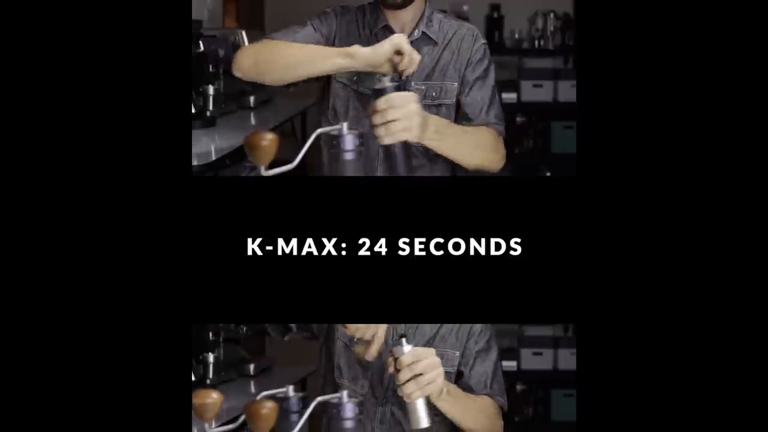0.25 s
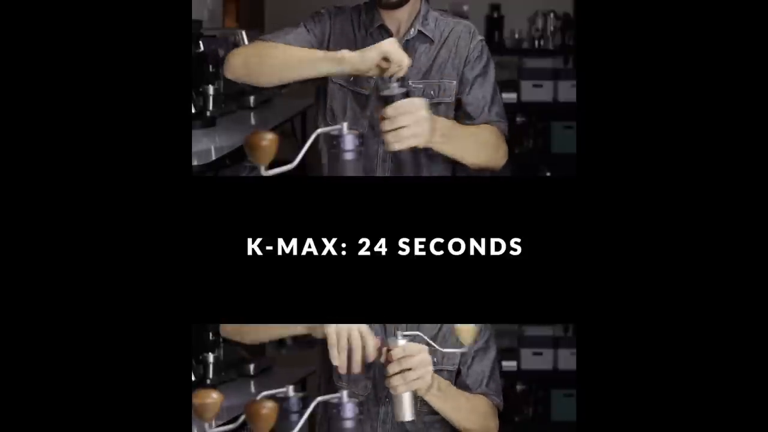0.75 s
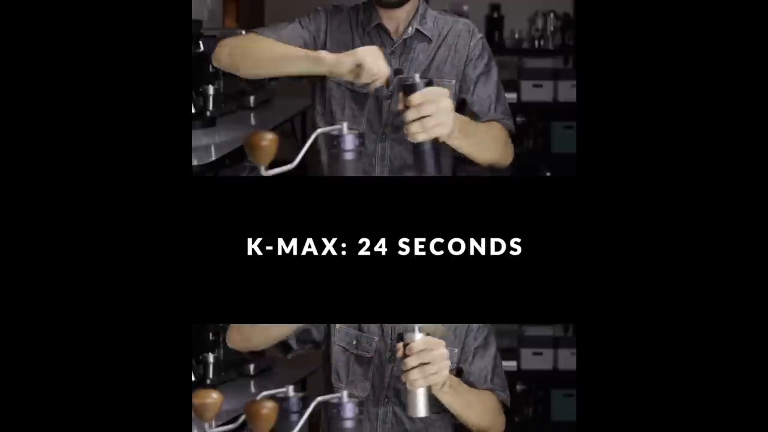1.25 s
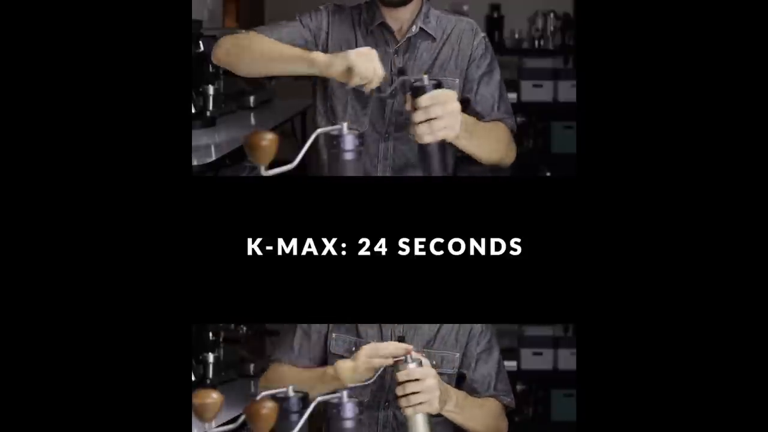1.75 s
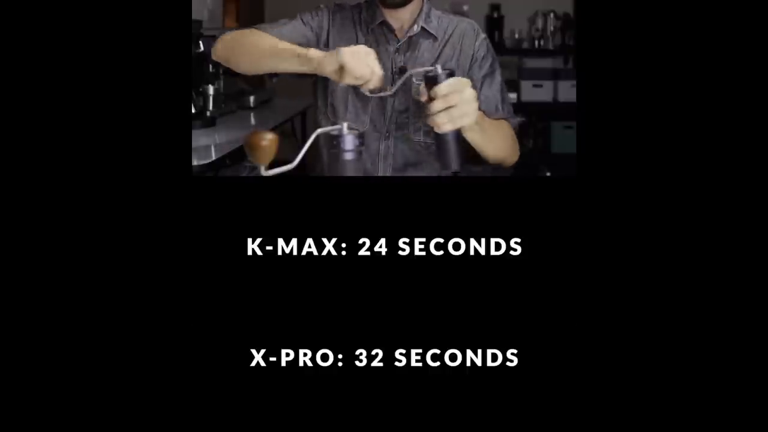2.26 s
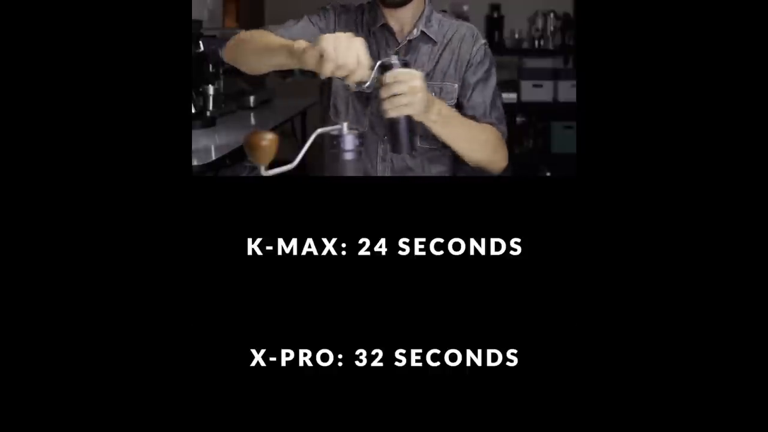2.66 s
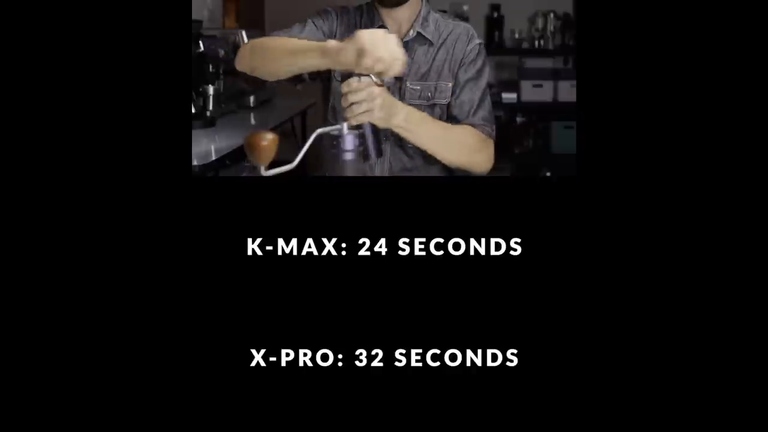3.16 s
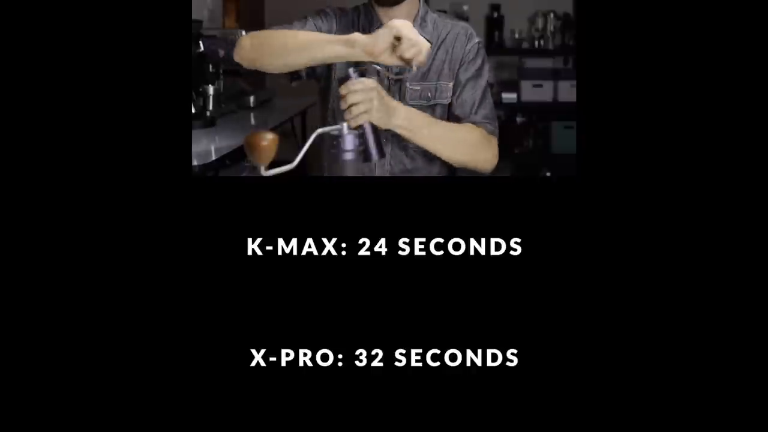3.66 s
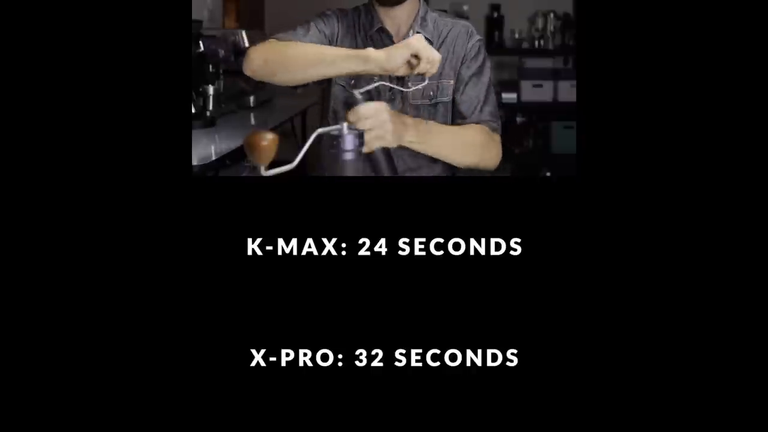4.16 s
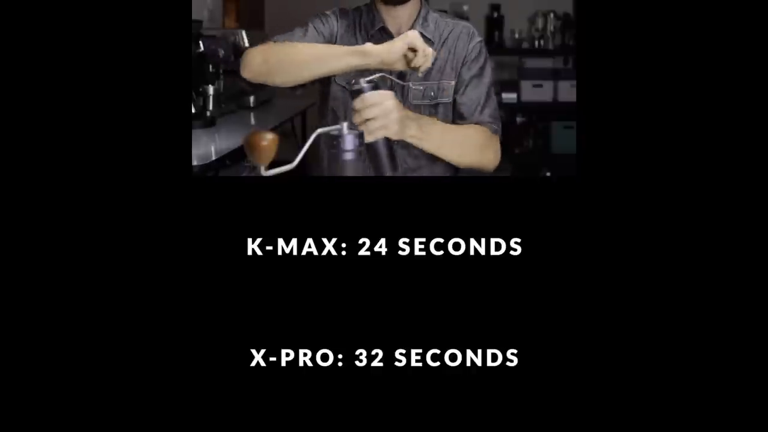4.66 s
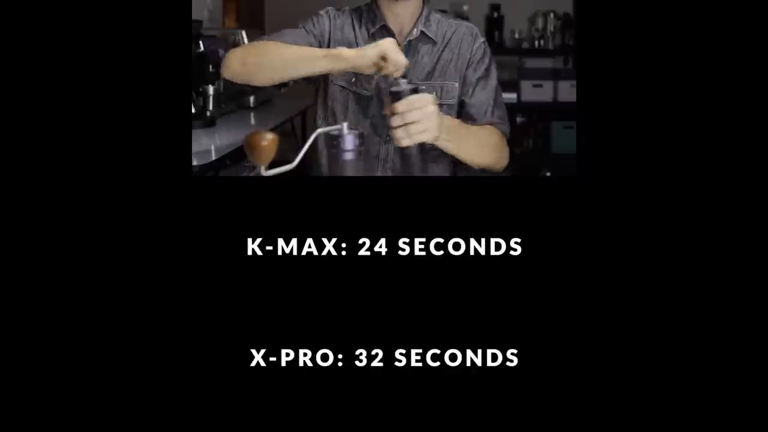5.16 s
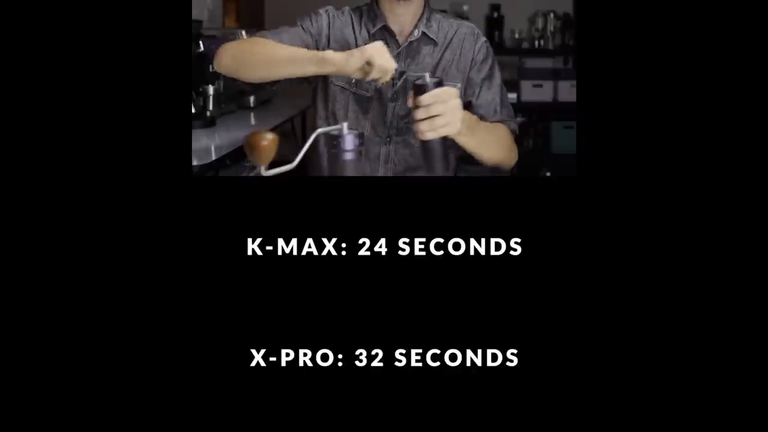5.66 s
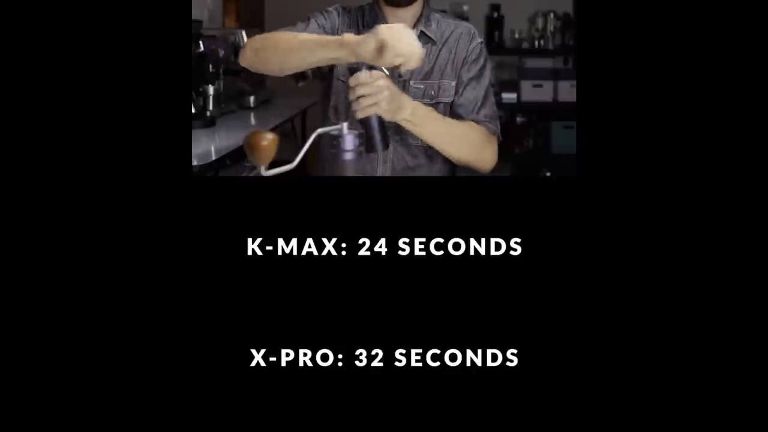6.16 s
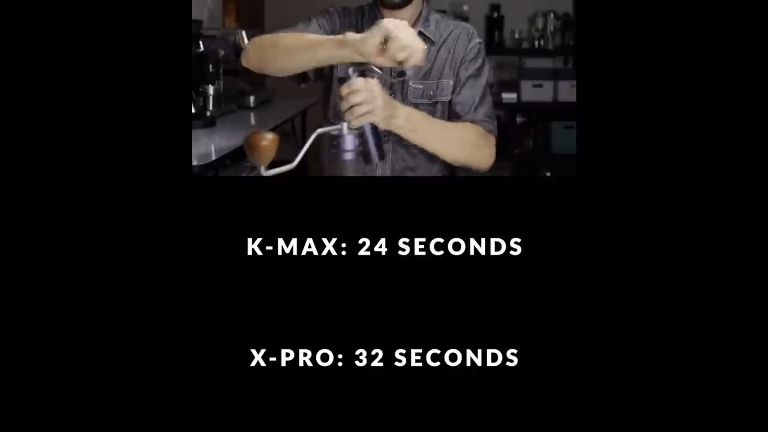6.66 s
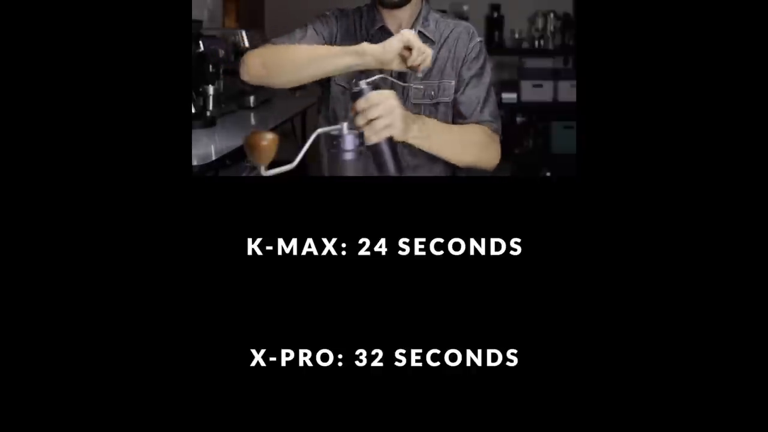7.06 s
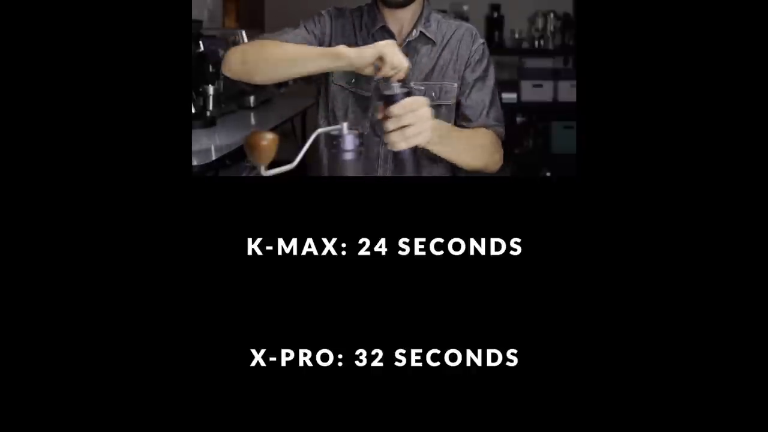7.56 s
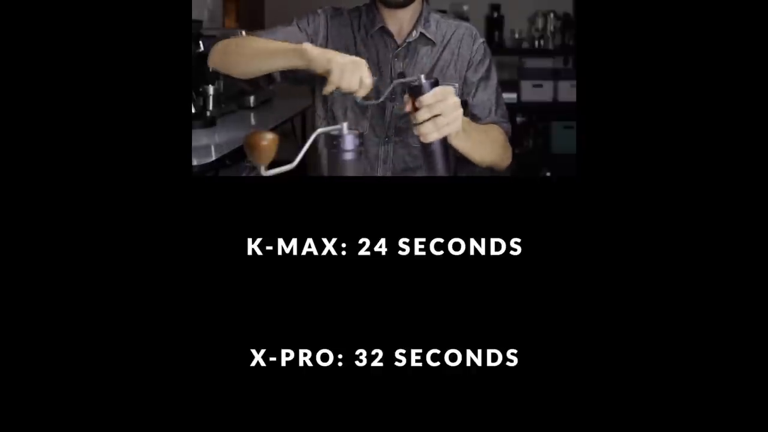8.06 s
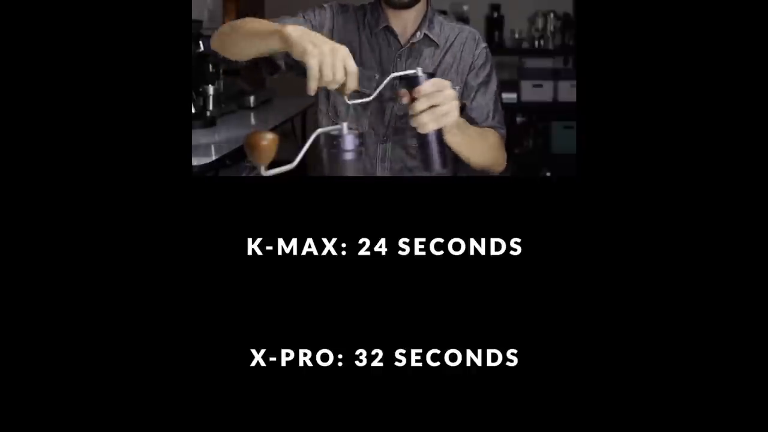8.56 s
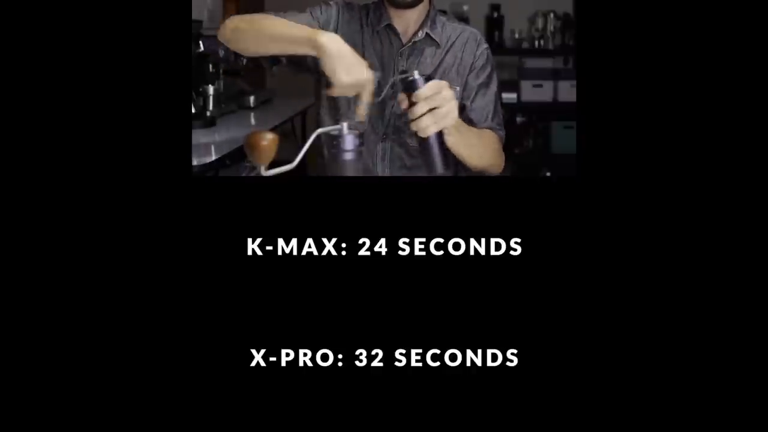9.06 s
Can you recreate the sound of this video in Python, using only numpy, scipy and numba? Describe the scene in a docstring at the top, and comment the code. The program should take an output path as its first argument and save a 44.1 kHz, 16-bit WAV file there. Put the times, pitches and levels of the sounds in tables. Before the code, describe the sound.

Coffee beans crunch and crackle in a metal hand grinder, cranked about twice a second, pausing briefly, then running empty with loose handle knocks.

```python
"""Beans crack and crumble in a hand coffee grinder, close up in a small room, cranked about twice a second.
Random fractures excite resonances of shell, beans and steel burrs; timed cracks break out above them.
The crank rests briefly, then the beans run out: the loose handle knocks and its knob rubs.
Behind it, shaped noise and slow puffs make the air stirred by the arm, over a faint room background."""
import sys
import numpy as np
from scipy import signal
from scipy.fft import rfft, irfft
from scipy.io import wavfile
from scipy.ndimage import uniform_filter1d
from numba import njit

SR = 44100
rng = np.random.default_rng(int(sys.argv[2]) if len(sys.argv) > 2 else 0)


def digitize_waveform(pressure):
    """Quantize a signal to 16-bit integers and store it at the path in sys.argv[1].

    Rows of a 2-D input are taken as channels; values are limited to [-1, 1].
    """
    field = np.atleast_2d(pressure).T
    bounded = np.clip(field, -1, 1)
    quanta = np.round(bounded * 32767).astype(np.int16)
    wavfile.write(sys.argv[1], SR, quanta)


N = 410130
TIME = np.arange(N) / SR


def undb(db):
    """Decibels to gain."""
    return 10 ** (np.asarray(db) / 20)


def unit(x):
    """Scale to rms 1."""
    return x / np.sqrt(np.mean(x ** 2))


def curves(rows):
    """The columns of a table after the first, joined by straight lines in time."""
    s, *columns = np.transpose(rows)
    return [np.interp(TIME, s, column) for column in columns]


def walk(rate_hz):
    """Smooth random wander with a spread near 1."""
    step = max(int(SR / rate_hz), 1)
    stairs = np.repeat(rng.standard_normal(N // step + 1), step)
    return unit(uniform_filter1d(stairs, step)[:N])


def noise(colour):
    """Noise of rms 1 with a spectrum of (pitch_hz, level_db) rows."""
    hz, db = np.transpose(colour)
    bins = np.maximum(np.fft.rfftfreq(N, 1 / SR), 1)
    gain = undb(np.interp(np.log(bins), np.log(hz), db))
    return unit(irfft(rfft(rng.standard_normal(N)) * gain, N))


def swells(times, sizes, rise_s, fall_s):
    """A sum of smooth humps, each rising to its size at its time and falling again."""
    grid = TIME[::100]
    since = grid - times[:, None]
    width = np.where(since < 0, np.reshape(rise_s, (-1, 1)), np.reshape(fall_s, (-1, 1)))
    return np.interp(TIME, grid, sizes @ np.exp(-(since / width) ** 2))


@njit
def svf(x, g, k):
    """State-variable band-pass whose centre and width may move."""
    y, band, low = np.empty(len(x)), 0., 0.
    for i in range(len(x)):
        v = (band + g[i] * (x[i] - low)) / (1 + g[i] * (g[i] + k[i]))
        band = 2 * v - band
        low = low + 2 * g[i] * v
        y[i] = k[i] * v
    return y


def resonate(force, hz, width_hz):
    """A steep resonance that keeps the power of the force; every grain strikes it with its own weight."""
    angle = 2 * np.pi * np.minimum(hz, .45 * SR) / SR
    every = np.ones(len(force))
    g = np.tan(angle / 2) * every
    k = 2 * np.pi * width_hz / SR / np.sin(angle) * every
    push = force * rng.standard_normal(len(force)) + 1e-18
    return svf(svf(push, g, k), g, k) * np.sqrt(2 * SR / (np.pi * width_hz))


FLARES_PER_S, FLARE_DB = 32, 2.4


def ring(force, modes, flare_db=0):
    """Resonances share the power of one force; each may flare on its own as the contact point moves."""
    total = np.sqrt(sum(undb(db) ** 2 for _, _, db in modes))
    out = 0
    for hz, width_hz, db in modes:
        flare = unit(undb(flare_db * walk(FLARES_PER_S))) if flare_db else 1
        out = out + undb(db) * resonate(force * flare, hz, width_hz)
    return out / total


def fade(power, seconds):
    """Spread each impulse of power into an exponential tail."""
    pole = np.exp(-1 / (seconds * SR))
    return signal.lfilter([1 - pole], [1, -pole], power)


def blows(times, db, seconds):
    """Force of short blows; dB is the level of their energy packed into a millisecond."""
    power = np.zeros(N)
    np.add.at(power, np.clip((times * SR).astype(int), 0, N - 1), undb(db) ** 2 * SR / 1000)
    return np.sqrt(fade(power, seconds))


def crumble(breaks, scatter_db, seconds, bed):
    """Force of many small fractures, near rms 1, over a bed of rubbing powder."""
    power = breaks * undb(scatter_db * rng.standard_normal(N)) ** 2
    local = uniform_filter1d(uniform_filter1d(power, size=2600), size=2600)
    even = fade(power / np.maximum(local, 1e-9), seconds)
    return np.sqrt((even + abs(bed)) / (1 + abs(bed)))


# grinding between pushes, one list before the rest and one after: start_s, shell_db, snap_db, grit_db
GRIND_LEVELS = [
    [(0.0, -24.5, -29, -29), (0.27, -31.5, -30.5, -30.5), (0.57, -31.5, -39.5, -36), (0.66, -41, -43, -42),
     (1.9, -38.5, -42, -41), (3.0, -41.5, -43, -40.5), (3.3, -37, -41, -39.5), (4.5, -42, -45.5, -44),
     (5.1, -42.5, -43.5, -43.5), (5.55, -34.5, -40.5, -40), (5.86, -43.5, -42, -44.5)],
    [(6.09, -27, -37, -28.5), (6.33, -32, -36, -36.5), (6.8, -33, -40, -37), (6.95, -42.5, -48, -50.5),
     (7.33, -37, -40, -34.5), (7.55, -42.5, -46.5, -47), (8.22, -49.5, -53, -51), (8.4, -44, -66, -43)],
]
# one push of the arm per turn: peak_s, swell_db, shaft_groan_db, crank_ring_db
ARM_PUSHES = [(0.08, -3, -65, -33), (0.45, 3, -45, -38), (1.01, 3, -47, -44), (1.54, 5.5, -45.5, -48),
              (2.092, 2.5, -46.5, -41.5), (2.55, 3.5, -51, -43.5), (3.05, 3, -65, -44),
              (3.65, 2.5, -45, -43.5), (4.29, 3.5, -47.5, -44), (4.788, 6.5, -45, -41.5),
              (5.35, 2.5, -43, -58), (6.23, 3, -48, -61), (6.63, 3.5, -46, -45.5), (7.06, 4.5, -49, -51.5),
              (7.61, 1.5, -58, -71), (8.072, 5.5, -80, -73)]
# the burrs' bite changes for a moment, mostly a loss: peak_s, half_length_s, level_db
BITE_SLIPS = [(0.95, 0.021, -9), (1.269, 0.012, 3), (1.422, 0.029, -2), (1.73, 0.017, -4),
              (2.336, 0.025, -4.5), (3.47, 0.14, -3.5), (3.975, 0.033, -5.5), (4.033, .01, -0.5),
              (5.248, 0.0091, 6), (5.44, 0.027, -5.5), (5.618, 0.04, -4), (6.542, 0.022, -3),
              (7.307, 0.017, -7.5), (7.58, 0.013, -1), (7.684, 0.018, -6), (7.777, 0.026, -8),
              (7.812, .015, -3.5), (7.958, 0.013, -5), (7.986, 0.0065, -5), (8.115, 0.0068, -2.5),
              (8.143, 0.0093, -4)]
# brief swells and dips of the shell's level: peak_s, half_length_s, level_db
SHELL_SURGES = [(0.52, 0.031, 1.5), (1.158, 0.019, 5), (1.617, 0.12, 1), (2.2, 0.043, 2), (2.687, .04, 6),
                (3.851, 0.063, 3), (4.971, .05, 4), (6.276, 0.052, 4.5), (6.694, 0.055, -1.5),
                (7.426, 0.046, 2.5), (8.173, 0.032, 6.5)]
# hollow note of the shell; glides as the grinder rocks, sinks as the hopper empties: time_s, pitch_hz
HOLLOW_NOTE = [(0, 1024), (.2, 930), (.33, 1140), (.48, 1000), (.6, 815), (.8, 1000), (1.0, 1460),
               (1.15, 952), (1.35, 990), (1.55, 1340), (1.7, 1230), (1.85, 953), (2.03, 1265), (2.2, 1110),
               (2.37, 920), (2.5, 1275), (2.68, 1275), (2.82, 893), (3.0, 1260), (3.33, 940), (3.5, 957),
               (3.65, 1246), (3.92, 880), (4.25, 1080), (4.45, 913), (4.75, 1214), (4.98, 1117), (5.2, 955),
               (5.32, 1247), (5.42, 847), (5.55, 1113), (6.1, 1173), (6.3, 875), (6.68, 943), (6.8, 814),
               (7.03, 972), (7.3, 770), (7.5, 850), (7.63, 993), (7.85, 735), (8.0, 920), (8.15, 780),
               (8.33, 817), (8.5, 795)]
PUSH_RISE_S, PUSH_FALL_S = 0.063, 0.18
GRIT_SWELL = 1.6  # dB of fine grit per dB of swell
STRAIN_LAG_S, STRAIN_S = 0.0064, 0.12  # strain peaks just after the push; rise and fall time
STRAIN_FLUTTER_DB = 3.5
GROAN_IDLE_DB, CRANK_IDLE_DB = -21, -19  # between pushes, relative to the shell


def cranking():
    """Pushes grind harder and strain shaft and crank: three levels in dB, two strain gains, a note in Hz."""
    push_s, swell_db, groan_db, crank_db = np.transpose(ARM_PUSHES)
    slip_s, slip_length, slip_db = np.transpose(BITE_SLIPS)
    surge_s, surge_length, surge_db = np.transpose(SHELL_SURGES)
    push = swells(push_s, swell_db, PUSH_RISE_S, PUSH_FALL_S)
    slip = swells(slip_s, slip_db, slip_length, slip_length)
    surge = swells(surge_s, surge_db, surge_length, surge_length)
    before, after = GRIND_LEVELS
    shell, snap, grit = (np.where(TIME < 6.073, a, b) for a, b in zip(curves(before), curves(after)))

    def strain(peak_db, idle_db):
        """Strain peaks after each push over a level that follows the shell, with a slow flutter."""
        peaks = swells(push_s + STRAIN_LAG_S, undb(peak_db), STRAIN_S, STRAIN_S)
        return np.hypot(peaks, undb(shell + idle_db)) * undb(slip + STRAIN_FLUTTER_DB * walk(16))

    groan, crank = strain(groan_db, GROAN_IDLE_DB), strain(crank_db, CRANK_IDLE_DB)
    shell_db, snap_db = shell + push + slip + surge, snap + push + slip
    grit_db = grit + GRIT_SWELL * push + slip
    return shell_db, snap_db, grit_db, groan, crank, curves(HOLLOW_NOTE)[0]


# how well the burrs are fed: time_s, share (0-1)
BURR_FEED = [(0, 1), (.55, 0.7), (.7, 0.71), (5.8, 0.69), (6.1, 0.88), (6.75, 0.84), (7.1, 0.7),
             (7.6, 0.51), (8.2, 0.45), (8.6, 0)]
# how firmly the burrs are turning on beans: time_s, share (0-1)
BURR_RUNNING = [(5.83, 1), (5.87, .5), (5.89, .2), (5.93, .06), (5.99, .01), (6.072, .015), (6.094, 1),
                (8.2, 1), (8.235, .55), (8.29, .33), (8.35, .36), (8.42, .12), (8.46, .18), (8.5, .15),
                (8.525, .05), (8.555, .2), (8.575, 0)]
# resonances of the hand-held shell: pitch_hz, width_hz, level_db
SHELL_MODES = [(448, 103, -18.5), (670, 580, -3), (991, 795, 2), (1420, 520, -3), (1806, 850, -6)]
# resonances of the breaking beans: pitch_hz, width_hz, level_db
SNAP_MODES = [(2440, 1500, 1.5), (3635, 950, -0.3), (4190, 690, -3), (5240, 3500, 3)]
# resonances of the steel burr: pitch_hz, width_hz, level_db
BURR_MODES = [(6490, 1060, -0.5), (6800, 560, 4), (8584, 490, -1.5)]
# high resonances that fine grit excites: pitch_hz, width_hz, level_db
GRIT_MODES = [(12000, 720, -9), (12940, 1130, -2.5), (14050, 2600, -3), (15300, 1200, -5)]
# resonances of the crank arm: pitch_hz, width_hz, level_db
CRANK_MODES = [(3130, 260, 2.5), (3327, 99, 0), (9920, 600, -5)]
CRUNCHES_PER_S, CRUNCH_DB = 55, 3.6
GROAN_HZ, GROAN_WANDER = 421, .04
BURR_FLUTTER_DB, BURR_WANDER = 4.2, .018
FRAGMENT_DB = -6


def grinding(drive, rate=1300, size_db=3.5, sparse_db=0.15):
    """Fragments break as the burr teeth catch them; each break rings shell, bean and steel together."""
    shell_db, snap_db, grit_db, groan, crank_strain, hollow_hz = drive
    feed = np.clip(curves(BURR_FEED)[0], .03, 1.5)
    # the teeth bite in separate crunches, with deeper gaps when poorly fed
    crunches = unit(undb(CRUNCH_DB * (1.04 - feed) * np.tanh(walk(CRUNCHES_PER_S))))
    running = curves(BURR_RUNNING)[0] * crunches
    # as the hopper empties the breaks grow fewer and less even, with less powder between them
    sizes = undb((size_db + sparse_db * (4.5 - feed)) * rng.standard_normal(N))
    breaks = (rng.random(N) < rate * feed / SR) * sizes ** 2
    coarse = running * crumble(breaks, scatter_db=2.5, seconds=0.0012, bed=.5 * feed)
    sharp = running * crumble(breaks, scatter_db=0.5, seconds=0.0001, bed=1.06 * feed ** 2)
    fine = running * crumble(breaks, scatter_db=1.0, seconds=0.00021, bed=0.69 * feed ** 2)
    thud = coarse * undb(shell_db - 0.24 + 1.4 * walk(45))
    snap = sharp * undb(snap_db + 1.14 * walk(70))
    grit = fine * undb(grit_db)
    # the hollow note and its two neighbours wander; an emptier grinder rings more freely
    hollow = (undb(-2.5) * resonate(thud, hollow_hz * (1 + 0.038 * walk(14)), 172)
              + undb(-9.5) * resonate(thud, hollow_hz * 0.804 * (1 + 0.05 * walk(9)), 106)
              + undb(-10.5) * resonate(thud, hollow_hz * 1.222 * (1 + 0.035 * walk(9)), 115))
    shell = undb(-2.5) * ring(thud, SHELL_MODES) + hollow * undb(7.8 * (0.7525 - feed))
    shaft_force = coarse * groan * unit(undb(STRAIN_FLUTTER_DB * walk(35)))
    shaft = undb(-0.5) * resonate(shaft_force, GROAN_HZ * (1 + GROAN_WANDER * walk(12)), 105)
    crank_force = sharp * crank_strain * unit(undb(STRAIN_FLUTTER_DB * walk(60)))
    crank = undb(-1.5) * ring(crank_force, CRANK_MODES)
    # beans snap in patches, each favouring some of the resonances
    beans = undb(-4.0) * ring(snap, SNAP_MODES, FLARE_DB) + undb(FRAGMENT_DB) * fragments(snap)
    # a packed burr clatters broadly; as it empties it sings at one note
    steel = snap ** (1 / 3) * grit ** (2 / 3) * undb(-1.0)
    clatter_db = -3.5 + BURR_FLUTTER_DB * np.tanh(walk(35))
    sing_db = -16.0 + 24.0 * (1 - feed) + BURR_FLUTTER_DB * np.tanh(walk(45))
    sing_hz = 6920 * (1 + BURR_WANDER * np.tanh(walk(25)))
    burr = (undb(clatter_db) * ring(steel, BURR_MODES, FLARE_DB)
            + undb(sing_db) * resonate(steel, sing_hz, 210)
            + undb(-26.0 + BURR_FLUTTER_DB * walk(30)) * resonate(steel, 8420, 224)
            + undb(-16.0 - 3.8 * (1.5 - feed)) * resonate(steel, 9800, 1700))
    return shell + shaft + crank + beans + burr + undb(0.4) * ring(grit, GRIT_MODES, FLARE_DB)


FRAGMENTS_PER_S, FRAGMENT_S, FRAGMENT_SCATTER_DB = 130, .003, 3.5  # the length varies by an octave either way
FRAGMENT_HZ, FRAGMENT_SPREAD_OCT, FRAGMENT_SAG_OCT, FRAGMENT_WIDTH_HZ = 3470, 0.78, .01, 800


def fragments(force, count=3):
    """Fragments crushed at once: short rattles that swell, die and ring at pitches sagging as they crumble."""
    out = 0
    for _ in range(count):
        starts = np.r_[0, np.flatnonzero(rng.random(N) < FRAGMENTS_PER_S / count / SR)]
        piece = np.repeat(np.arange(len(starts)), np.diff(np.r_[starts, N]))
        size, tone, length = rng.uniform(-1.01, 1, (len(starts), 3)).T
        life = (TIME - TIME[starts][piece]) / (FRAGMENT_S * 2 ** length)[piece]
        rattle = undb(FRAGMENT_SCATTER_DB * size)[piece] * life * np.exp(-life)
        octaves = FRAGMENT_SPREAD_OCT * tone[piece] - FRAGMENT_SAG_OCT * np.minimum(life, 2)
        out = out + resonate(force * unit(rattle), FRAGMENT_HZ * 2 ** octaves, FRAGMENT_WIDTH_HZ)
    return out / np.sqrt(count)


# whole beans breaking: start_s, splintering_s, shell_db, snap_db, grit_db, snap_pitch_hz
BEAN_CRACKS = [(0.009, 0.0085, -14, -25, -36, 3100), (0.06, 0.0095, -15, -18.5, -23, 4400),
               (0.1698, 0.0016, -15, -16.5, -19, 3600), (0.235, .006, -19, -22, -33, 4200),
               (0.336, 0.0085, -17, -17, -28, 4330), (0.415, 0.0087, -8.5, -22, -26, 3000),
               (0.503, 0.0043, -19, -22, -22, 3540), (0.579, 0.0023, -18, -27.5, -32, 4200),
               (0.837, 0.0064, -22, -25, -28, 4330), (0.8998, 0.015, -18, -31.5, -26, 3950),
               (1.009, 0.037, -18, -31, -20, 3830), (1.17, 0.019, -28, -41, -37, 2910),
               (1.215, 0.0042, -37, -29, -25, 3490), (1.3239, 0.018, -35, -22, -22.5, 3660),
               (1.396, 0.0017, -36, -26, -32, 4130), (1.461, 0.0022, -24, -33, -26, 2996),
               (1.477, 0.0031, -24, -40, -26, 3590), (1.507, 0.035, -23, -24.5, -17, 3370),
               (1.7612, 0.0063, -14, -18.5, -42, 4100), (1.84, 0.016, -23, -24, -23, 4150),
               (1.919, 0.04, -30, -26, -28, 3600), (2.026, 0.0067, -21, -35, -20, 4040),
               (2.1088, 0.025, -38, -29, -20.5, 3960), (2.14, 0.032, -19, -26, -27, 3550),
               (2.267, 0.0042, -22, -17, -33, 3880), (2.284, 0.012, -18.5, -21, -27, 4050),
               (2.3961, 0.0052, -29, -28, -31, 4050), (2.432, 0.0025, -42, -24.5, -27, 4610),
               (2.476, 0.0018, -29, -33, -30, 4850), (2.5363, 0.0067, -14.5, -24, -26, 3300),
               (2.643, 0.0088, -17, -20, -19, 5100), (2.662, 0.0072, -18.5, -28, -20, 5530),
               (2.804, 0.0027, -20, -35, -36, 4200), (2.845, 0.0017, -28, -32, -32, 4010),
               (2.922, 0.0052, -23.5, -27, -38, 5460), (2.94, 0.0053, -21, -23.5, -28, 4040),
               (2.995, 0.0058, -39, -21, -30, 4090), (3.014, 0.016, -24, -19, -28, 4240),
               (3.036, .003, -21, -24, -25, 4400), (3.063, 0.0042, -17, -28, -24, 3920),
               (3.153, 0.0062, -30, -39, -38, 3600), (3.0954, 0.0041, -25, -34, -28, 2930),
               (3.217, 0.0044, -19, -25.5, -21, 3350), (3.278, 0.0026, -17.5, -30, -23, 3560),
               (3.4129, 0.014, -17, -25, -34, 3550), (3.4893, 0.0045, -22, -25, -32, 4230),
               (3.547, 0.0027, -28, -27, -28, 4500), (3.86, 0.031, -27, -27, -28, 4380),
               (3.9, 0.0046, -18, -34, -38, 3552), (4.038, 0.0017, -17, -32, -27, 5440),
               (4.066, 0.004, -21, -20.5, -25, 5790), (4.08, 0.0035, -20, -23, -25, 4080),
               (4.115, 0.0019, -25, -29, -34, 4160), (4.2499, 0.027, -41, -28, -21.5, 3170),
               (4.455, 0.0024, -35, -44, -36, 4300), (4.6142, 0.0027, -26, -33.5, -32, 4040),
               (4.701, 0.0061, -27, -21.5, -27, 4400), (4.7565, 0.006, -37, -20, -20.5, 5050),
               (4.7938, 0.0051, -17.5, -27, -24, 3240), (4.854, 0.0022, -25, -17.5, -18, 3700),
               (4.8717, 0.0021, -23, -37, -19, 3313), (4.891, 0.0033, -21, -30, -22, 3390),
               (4.973, .003, -25, -27.5, -32, 4260), (5.0753, 0.0041, -40, -26, -54, 3640),
               (5.1424, 0.032, -18.5, -22.5, -29, 4180), (5.278, 0.0031, -23, -28, -29, 4340),
               (5.287, 0.0083, -24, -22.5, -33, 4560), (5.323, 0.0034, -18, -32, -26, 4905),
               (5.359, 0.0057, -12.5, -24, -17, 3120), (5.373, 0.0038, -12, -28, -12, 3130),
               (5.4, 0.0033, -17, -35, -33, 2900), (5.416, 0.0065, -19, -40, -32, 3000),
               (5.484, 0.0052, -16, -42, -38, 3900), (5.5061, 0.0091, -16.5, -21, -30, 4080),
               (5.54, 0.01, -18, -18.5, -36, 6550), (5.5548, 0.013, -14, -18, -37, 3830),
               (5.6697, 0.0054, -22, -24, -34, 4690), (5.699, 0.0038, -19, -20, -33, 4120),
               (5.8132, 0.0032, -22.5, -23, -27, 4740), (6.0794, 0.019, -25, -22, -34, 3560),
               (6.142, .003, -15.5, -21, -22, 5150), (6.295, .002, -9, -23, -25, 3380),
               (6.359, 0.004, -11.5, -22, -24, 4220), (6.384, 0.016, -26, -18, -22, 4060),
               (6.413, 0.011, -22, -20.5, -23, 4260), (6.56, 0.0024, -26, -20, -27, 4000),
               (6.645, 0.0019, -20, -29, -27, 4810), (6.9, 0.0033, -19, -29, -30, 4330),
               (6.927, .004, -25, -27, -42, 3100), (6.9938, 0.0042, -19.5, -22, -26, 4130),
               (7.014, 0.0031, -28, -28, -34, 4180), (7.035, 0.014, -22, -30, -34, 4280),
               (7.06, .002, -32, -29, -31, 4230), (7.111, 0.0049, -20, -28, -23, 3080),
               (7.137, 0.0047, -16, -25, -21.5, 3440), (7.15, .002, -21, -29, -26, 3480),
               (7.172, .003, -25, -30, -22.5, 3400), (7.269, 0.0045, -20.5, -30, -22, 3560),
               (7.329, 0.0019, -23, -28, -23, 3570), (7.347, .005, -21, -25, -19, 3570),
               (7.4348, 0.004, -23, -35, -39, 4240), (7.451, 0.0036, -20, -30, -29, 4370),
               (7.512, 0.0088, -21, -41, -37, 5100), (7.603, 0.0028, -14, -15.5, -27, 4400),
               (7.618, .012, -25, -34, -36, 2200), (7.699, 0.018, -22.5, -29.5, -33, 3886),
               (7.743, .005, -26, -36, -30, 3970), (7.7901, 0.0075, -25, -31, -37, 3860),
               (7.836, .006, -24, -44, -39, 2020), (7.8954, 0.0082, -21, -33, -25, 3430),
               (7.913, 0.004, -19, -23.5, -40, 2736), (7.997, 0.007, -30, -48, -35, 3403),
               (8.025, .002, -32, -42, -32, 4000), (8.05, 0.011, -31, -35, -38, 4200),
               (8.0786, .004, -30, -26.5, -35, 4490), (8.094, 0.0074, -22, -27, -38, 4300),
               (8.166, 0.0063, -27, -31, -42, 4180), (8.198, 0.0051, -21.5, -46.5, -41, 3906),
               (8.3341, 0.023, -22.5, -37.5, -37, 3177), (8.48, 0.013, -34, -55, -42.5, 2918),
               (8.4893, 0.0063, -27, -41, -35, 3430), (8.542, .002, -41, -46, -43, 4000),
               (8.549, 0.0085, -25.5, -37, -38, 3994), (9.0729, 0.002, -35, -40, -39, 4300)]
SPLINTERS_PER_S = 130
# a bean starts to give just before it breaks: longest lead, and (shell, snap, grit) dB relative to the break
CREAK_S, CREAK_DB = .004, (-14, -11, -25.5)
# smaller pieces crack at random: rate, and mean (shell, snap, grit) dB over the grinding
CHIPS_PER_S, CHIP_DB, CHIP_SCATTER_DB = 13, (4.5, 3.5, 6.5), 3.5
CHIP_HZ, CHIP_SPREAD_OCT = 4050, 0.4  # each chip snaps at its own pitch
CHIP_PACKED_DB = -10  # chips stand out less from well-fed burrs: dB per share of feed above its mean


def cracks(levels_db, hollow_hz, splinter_db=-5.0, splinter_scatter_db=-0.5, burr_db=-4.0):
    """A bean creaks, breaks with a blow and a pitched snap, then splinters; chips crack in between."""
    s, length, *db, hz = np.transpose(BEAN_CRACKS)
    db = np.array(db)
    feed = curves(BURR_FEED)[0]
    chips = np.flatnonzero(rng.random(N) < CHIPS_PER_S * curves(BURR_RUNNING)[0] ** 2 / SR)
    size, tone = rng.standard_normal((2, N))[:, chips]
    chip_db = np.array([level[chips] + over for level, over in zip(levels_db, CHIP_DB)])
    chip_db = chip_db + CHIP_SCATTER_DB * np.minimum(size, 1) + CHIP_PACKED_DB * (feed[chips] - feed.mean())
    # each splinter belongs to one of the breaking beans
    bean = np.repeat(np.arange(len(s)), np.ceil(np.abs(length) * SPLINTERS_PER_S).astype(int))
    splinters = s[bean] + length[bean] * rng.uniform(.15, 1, len(bean))
    splinters_db = db[:, bean] + splinter_db + splinter_scatter_db * rng.standard_normal((len(bean), 3)).T
    splinter_hz = hz[bean] * (1 + .1 * rng.standard_normal(len(bean)))
    creaks = s - CREAK_S * rng.uniform(.5, 1, len(s))
    times = np.r_[creaks, s, splinters, chips / SR]
    shell_db, snap_db, grit_db = np.hstack([db + np.array(CREAK_DB)[:, None], db, splinters_db, chip_db])
    # the snap follows the pitch of whichever piece broke last, tuned 0.2 ms ahead
    pitches = np.r_[hz, hz, splinter_hz, CHIP_HZ * 2 ** (CHIP_SPREAD_OCT * tone)]
    order = np.argsort(times)
    latest = np.maximum(np.searchsorted(times[order], TIME + .0002) - 1, 0)
    pitch = pitches[order][latest]
    thud = blows(times, shell_db, seconds=0.00092)
    snap = blows(times, snap_db, seconds=0.00048)
    steel = blows(times, (snap_db + grit_db) / 2 + burr_db, seconds=0.00025)
    grit = blows(times, grit_db, seconds=0.00081)
    return (undb(-8.0) * ring(thud, SHELL_MODES)
            + undb(-13.0 + 8.3 * (1 - feed)) * resonate(thud, hollow_hz, 240)
            + undb(-11.0) * ring(snap, SNAP_MODES) + undb(-6.0) * resonate(snap, pitch, 850)
            + undb(2.0) * ring(steel, BURR_MODES) + undb(-17.0) * resonate(steel, 6904, 180)
            + undb(-2.0) * ring(grit, GRIT_MODES))


# a bean wedged and dragged between the burrs: start_s, length_s, level_db, first_pitch_hz, last_pitch_hz
BEAN_SQUEAKS = [(0.284, 0.077, -36.5, 3760, 4460), (2.1, 0.034, -31.5, 4250, 3900),
                (2.11, 0.037, -32.5, 3220, 3650), (2.523, 0.052, -37, 3400, 3170),
                (2.62, 0.042, -34, 3356, 3273), (2.971, 0.054, -33, 4370, 4070),
                (5.273, 0.014, -38, 4400, 4140), (5.36, 0.039, -35, 3340, 3148),
                (6.369, 0.081, -37, 4260, 4090), (6.92, 0.015, -38, 3750, 3300),
                (7.031, 0.03, -38, 4170, 4300)]
SQUEAK_SLIPS_PER_S, SQUEAK_WIDTH_HZ = 760, 420


def squeaks(scatter_db=11.0):
    """A wedged bean sticks and slips in a quick, uneven rattle; its note glides as it is crushed."""
    force, pitch = np.zeros(N), np.full(N, CHIP_HZ * 1.)
    for s, length, db, first_hz, last_hz in BEAN_SQUEAKS:
        along = np.clip((TIME - s) / length, 0, 1)
        arch = undb(db) * np.sqrt(4 * along * (1 - along))
        # where squeaks overlap, the stronger one sets force and pitch
        pitch = np.where(arch > force, first_hz + (last_hz - first_hz) * along, pitch)
        force = np.maximum(force, arch)
    slips = (rng.random(N) < SQUEAK_SLIPS_PER_S / SR) * 1.
    return resonate(force * crumble(slips, scatter_db, seconds=0.00023, bed=.2), pitch, SQUEAK_WIDTH_HZ)


# knocks of the loose handle: start_s, level_db, centre_hz, spread_oct, ringing_note_hz, note_db
HANDLE_KNOCKS = [(8.66, -27.5, 2940, 0.9, 2630, -42), (8.667, -28.5, 2370, 0.55, 2400, -43),
                 (8.676, -37, 2600, .6, 2670, -47), (8.808, -42, 2500, 2.8, 1500, -57),
                 (8.904, -35, 2820, 1.1, 3650, -43), (8.909, -29, 1700, 0.92, 1260, -42),
                 (9.091, -37, 2135, 0.45, 2110, -52), (9.137, -28.5, 2700, 0.8, 2940, -42),
                 (9.145, -20.5, 1840, 0.41, 910, -38), (9.15, -44, 1396, .8, 1320, -50),
                 (9.282, -25, 2500, 0.75, 3140, -34), (9.286, -26, 2000, 0.85, 1070, -35),
                 (9.297, -29, 1400, 0.55, 1400, -37)]
# resonances of the handle: pitch_hz, width_hz, level_db
HANDLE_MODES = [(350, 140, 0), (954, 240, 1), (1336, 226, -2.5), (1820, 320, -5.5), (2300, 270, -4.5),
                (2790, 410, -8.5), (3240, 230, -12), (3710, 260, -7.5), (4360, 1900, -8.5)]
# the knob rubbing on its pin: time_s, level_db
KNOB_RUB = [(9.17, -110), (9.2, -66), (9.228, -56), (9.248, -54), (9.275, -57), (9.3, -59)]
# resonances of the rubbing knob: pitch_hz, width_hz, level_db
KNOB_MODES = [(1590, 210, -6), (1905, 620, -17), (3207, 330, -15)]
RUB_FLUTTER_DB, HANDLE_RING_WIDTH_HZ = 4.5, 50


def handle():
    """With no beans to hold it, the handle knocks in its play and the knob rubs."""
    s, db, centre, spread, note_hz, note_db = np.transpose(HANDLE_KNOCKS)
    knocks = 0
    for hz, width_hz, mode_db in HANDLE_MODES:
        # each blow feeds the modes near its centre most
        blow_db = db - 6 * np.abs(np.log2(hz / centre) / spread)
        knocks = knocks + undb(mode_db) * resonate(blows(s, blow_db, seconds=0.00083), hz, width_hz)
    # where the handle is caught decides which note rings on
    since = np.maximum(TIME - s[:, None], 0)
    decay = np.exp(-np.pi * HANDLE_RING_WIDTH_HZ * since)
    notes = undb(note_db) @ (decay * np.sin(2 * np.pi * note_hz[:, None] * since))
    rub_force = undb(curves(KNOB_RUB)[0] + RUB_FLUTTER_DB * np.tanh(walk(220)))
    return undb(-6.0) * knocks + undb(0.5) * notes + ring(rub_force, KNOB_MODES)


def counter(x, echo_db=-9.5):
    """The worktop returns an early, duller echo whose path changes as the grinder sways."""
    lag_s = .0042 * (1 + .18 * walk(3))
    dull = signal.sosfilt(signal.butter(1, 5000, fs=SR, output="sos"), x)
    return x + undb(echo_db) * np.interp(TIME - lag_s, TIME, dull)


def room(x, t60_s=0.19, treble_t60_s=0.07, wet_db=-13, late_t60_s=0.22, late_db=-15):
    """Shelves and walls return a short, diffuse tail whose treble dies first, then a faint, dark afterglow."""
    t = np.arange(SR // 2) / SR
    wash = rng.standard_normal(len(t))
    low = signal.sosfilt(signal.butter(2, 3500, fs=SR, output="sos"), wash)
    dark = low * (undb(-60 * t / t60_s) + undb(late_db - 60 * t / late_t60_s))
    treble = 0.08 * wash * undb(-60 * t / treble_t60_s)
    tail = (dark + treble) * (t > .003)
    tail /= np.sqrt(np.sum(tail ** 2) * 5)
    return x + undb(wet_db) * signal.fftconvolve(x, tail)[:N]


# rumble of air stirred by the arm: time_s, level_db
AIR_LEVEL = [(0.0, -40), (0.7, -44.5), (2.35, -45), (2.7, -35), (3.1, -39), (3.52, -44.5), (3.65, -36),
             (4.0, -43.5), (4.65, -42.5), (5.07, -39.5), (5.7, -43), (7.0, -46), (8.3, -51), (9.3, -46)]
# spectrum of that air: pitch_hz, level_db
AIR_SPECTRUM = [(10, -3.5), (22, -11), (34, 2), (55, -4.5), (80, -10.5), (125, -19), (200, -31.5),
                (400, -28), (900, -77)]
# puffs of air on the microphone: centre_s, pitch_hz, half_length_s, level_db
AIR_PUFFS = [(2.654, 13, 0.03, -13.5), (2.682, 21, 0.011, -4.5), (2.695, 103, 0.0092, -30),
             (2.936, 18, .02, -20), (5.071, 36, 0.027, -27.5)]


def air():
    """Air stirred by the arm is low noise on a level curve; puffs on the microphone are brief slow waves."""
    puffs = 0
    for s, hz, length, db in AIR_PUFFS:
        swell = np.exp(-((TIME - s) / length) ** 2)
        puffs = puffs + undb(db) * swell * np.sin(2 * np.pi * hz * (TIME - s))
    return noise(AIR_SPECTRUM) * undb(curves(AIR_LEVEL)[0]) + puffs


# spectrum of the room background: pitch_hz, level_db
ROOM_SPECTRUM = [(30, 3.5), (130, 1.5), (250, -10), (400, -16), (600, -16.5), (1000, -22), (2000, -28),
                 (3300, -27.5), (5000, -35), (6900, -38), (8000, -39.5), (10700, -35.5), (12500, -23.5),
                 (16000, -31.5)]


def background(level_db=-54):
    """The quiet room is steady noise of a fixed spectrum."""
    return undb(level_db) * noise(ROOM_SPECTRUM)


def scene():
    """Grinder and handle in the room, over air and a faint background."""
    drive = cranking()
    sources = grinding(drive) + cracks(drive[:3], drive[-1]) + squeaks() + handle()
    grinder = undb(-1.9) * counter(sources)
    return (room(grinder) + air() + background())[None]


def record(dry, top_hz=15800):
    """The recorder cuts the top steeply with an elliptic low-pass."""
    return signal.sosfilt(signal.ellip(10, .2, 70, top_hz, fs=SR, output="sos"), dry)


dry = scene()
out = record(dry)
digitize_waveform(out)
```